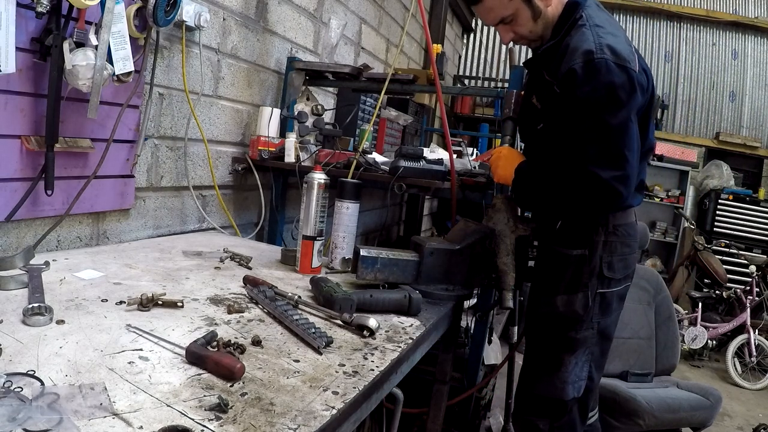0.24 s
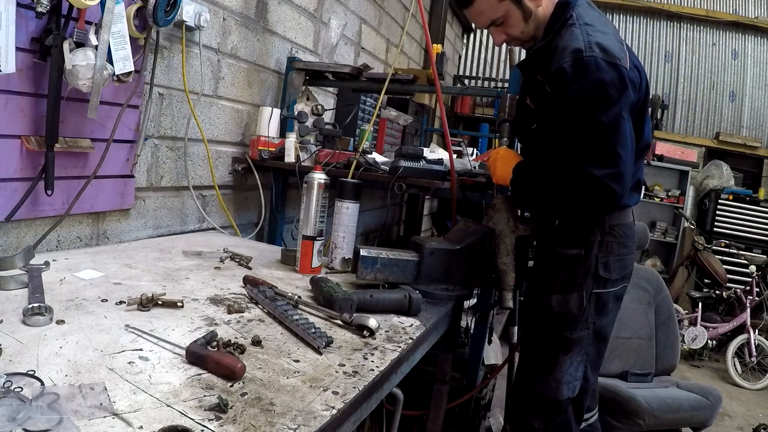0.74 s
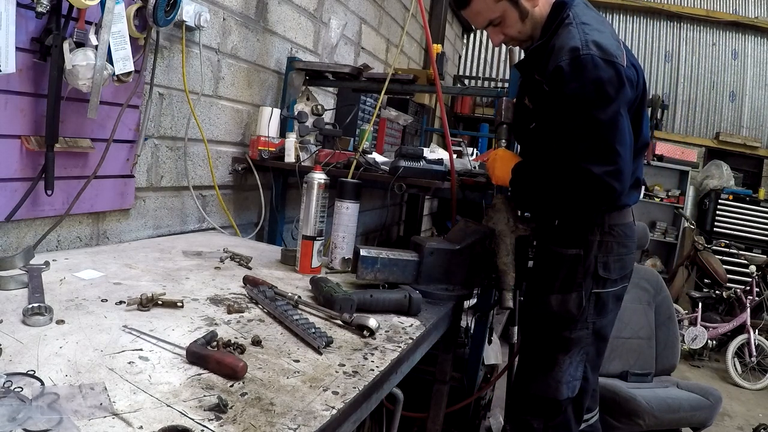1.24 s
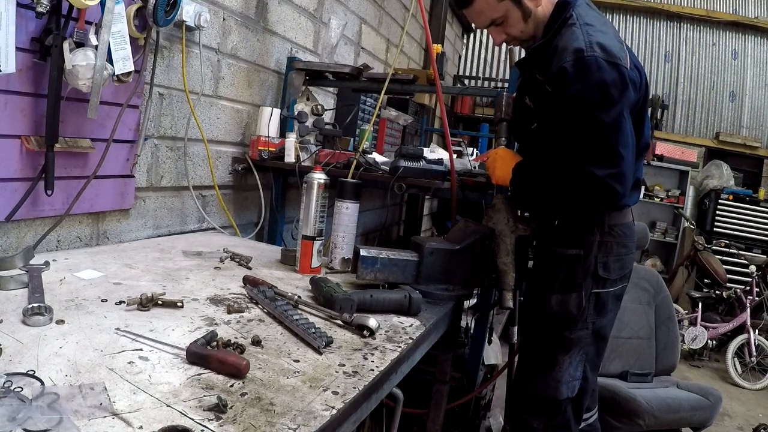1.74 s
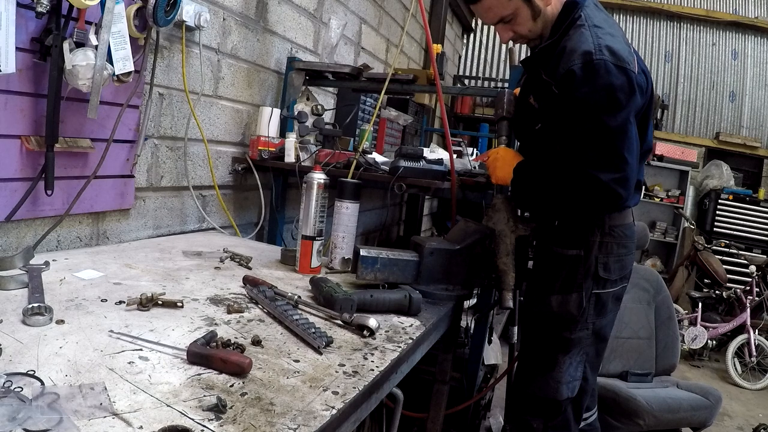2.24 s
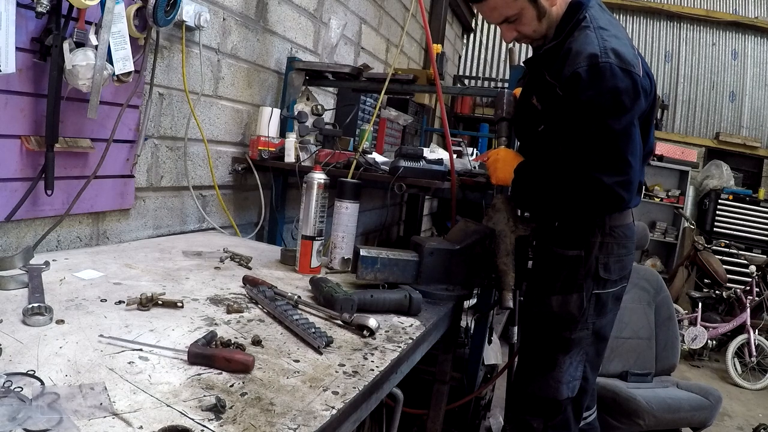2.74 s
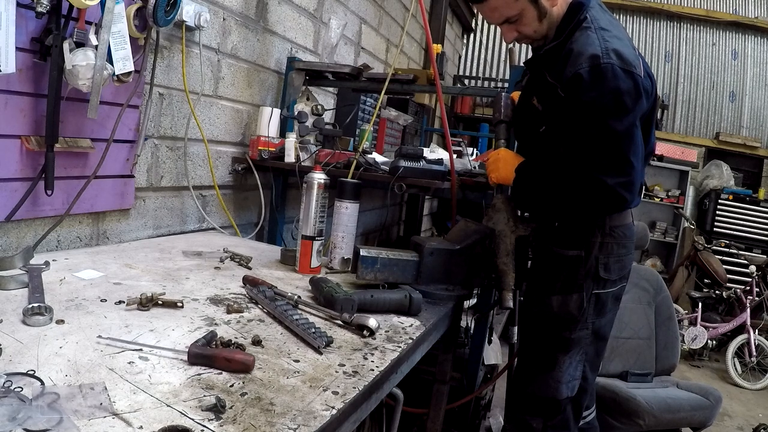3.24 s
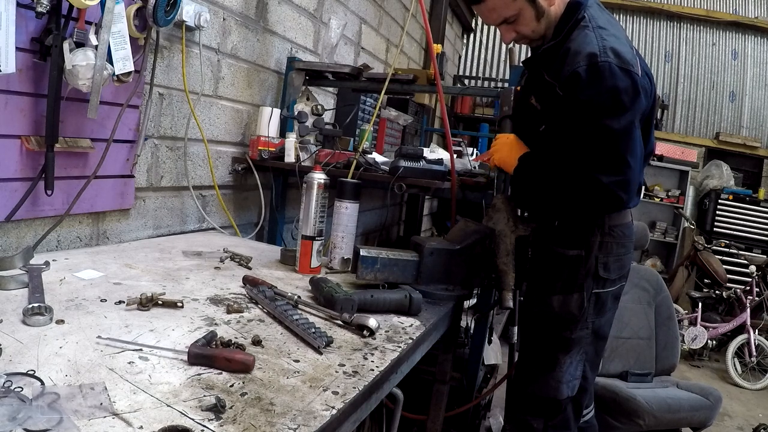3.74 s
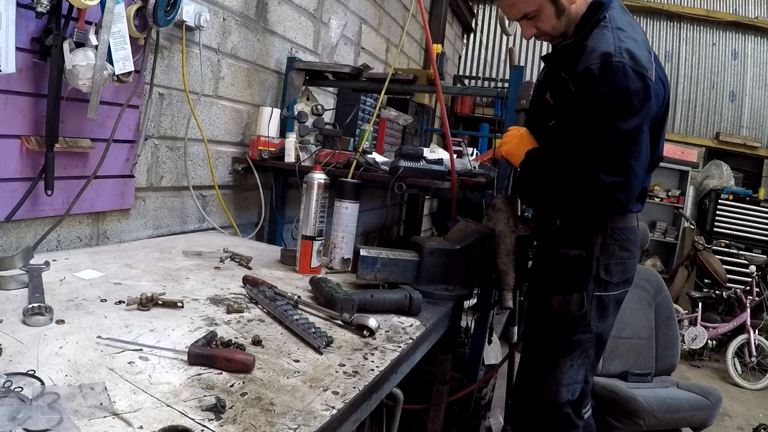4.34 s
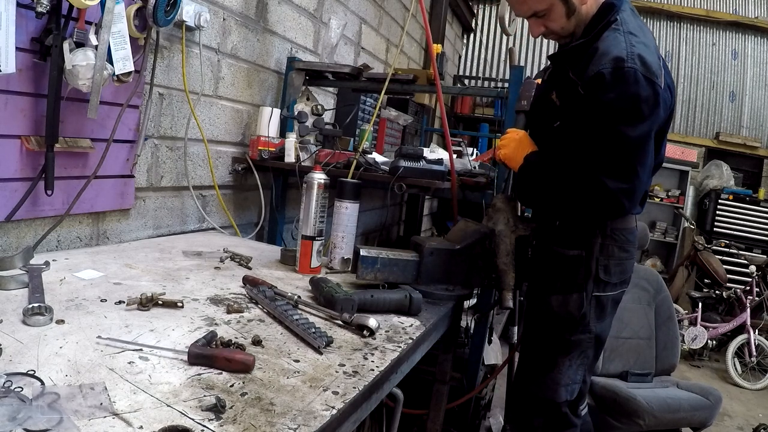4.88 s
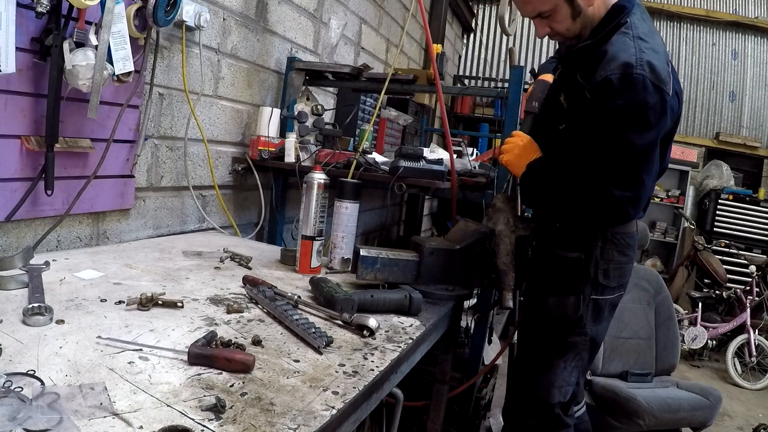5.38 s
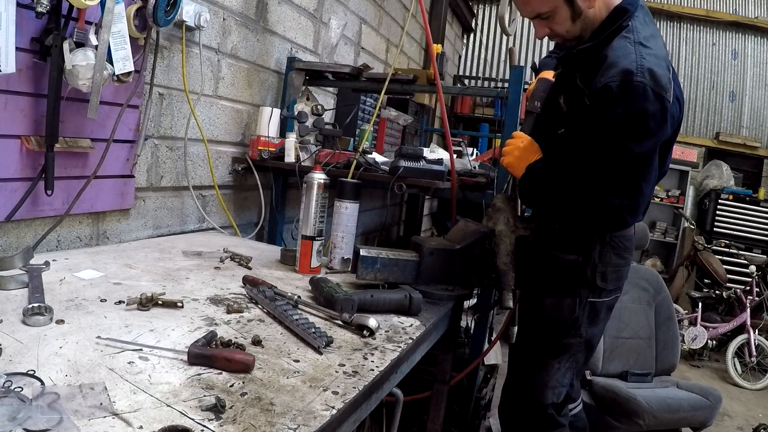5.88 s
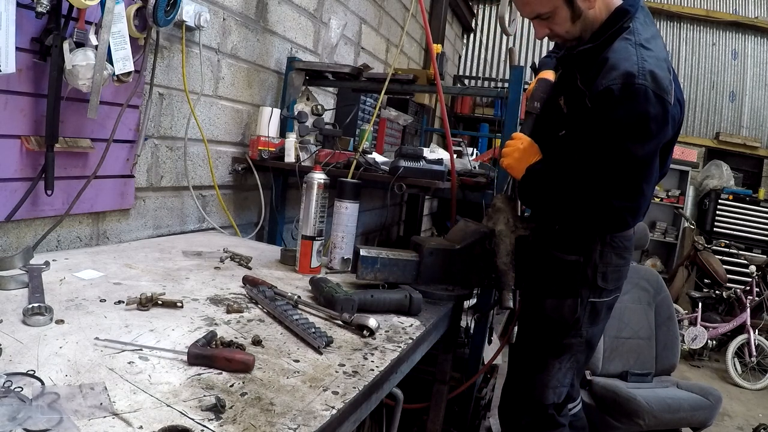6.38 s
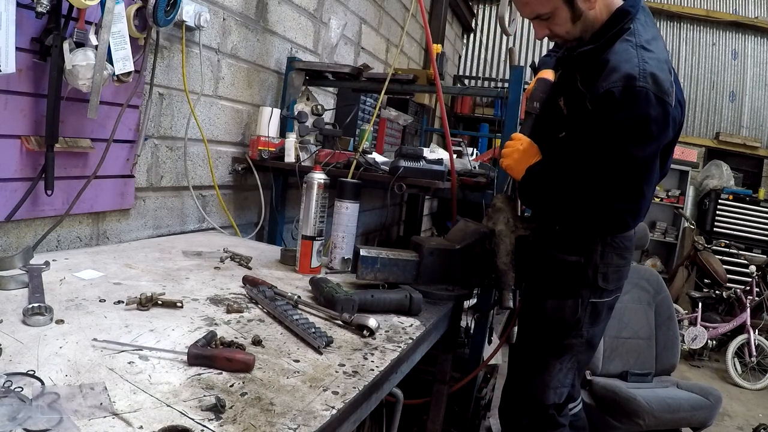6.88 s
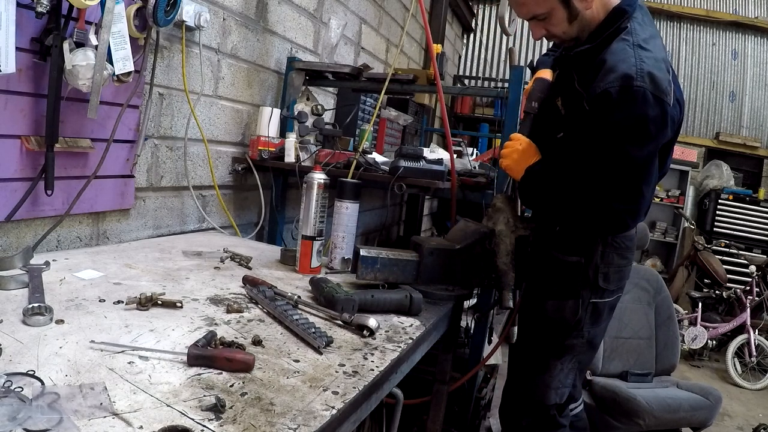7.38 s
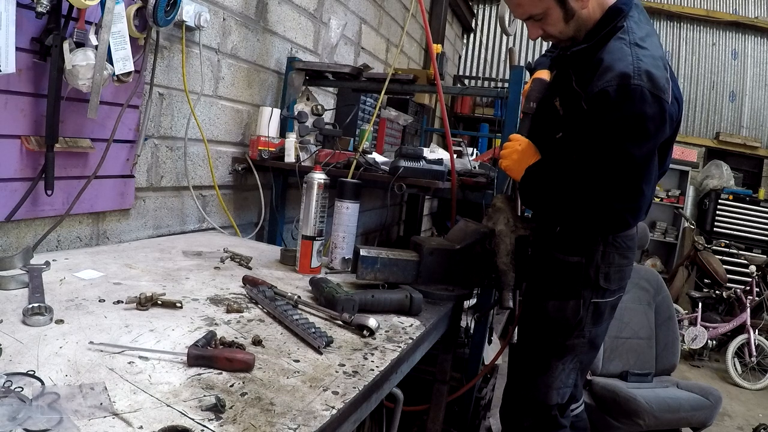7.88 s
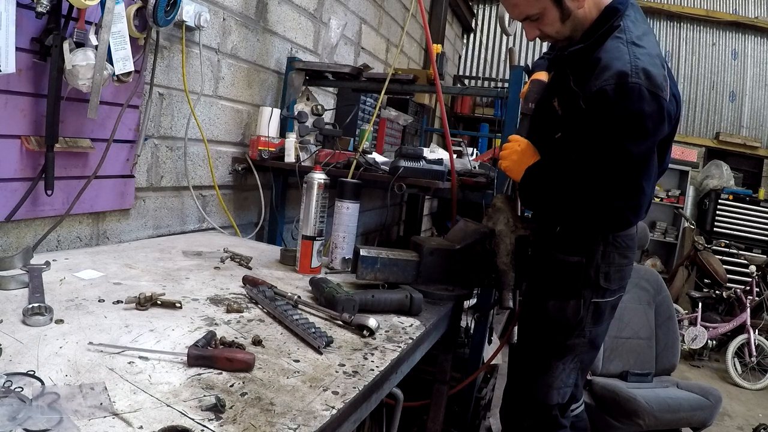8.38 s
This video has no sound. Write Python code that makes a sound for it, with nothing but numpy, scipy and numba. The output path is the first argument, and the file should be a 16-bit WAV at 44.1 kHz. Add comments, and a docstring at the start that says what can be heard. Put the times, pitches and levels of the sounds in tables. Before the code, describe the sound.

A pneumatic hammer fires a string of brief, loud bursts on metal clamped in a vise, close to the microphone. Each burst is a fast clanking rattle with a steel ring and a sizzle of exhaust air. In the gap that follows, the steady chug and hum of a compressor rises from the far side of the garage, before the tool hammers without a break to the end.

```python
"""Air hammer in a garage

Close to the microphone an air hammer works a steel part in a bench vise: seven short bursts, then one
long run with the tool upright. Each blow thumps the bench, clanks the vise, rings the steel and vents
a puff of air. A piston compressor chugs across the room; the automatic gain control pushes it down
while the hammer runs and lets it swell in the pause."""
import sys
import numpy as np
from scipy import signal
from scipy.fft import rfft, irfft
from scipy.io import wavfile
from scipy.ndimage import uniform_filter1d
from numba import njit

SR = 44100
rng = np.random.default_rng(int(sys.argv[2]) if len(sys.argv) > 2 else 0)


def write(x):
    x = np.atleast_2d(x).T
    wavfile.write(sys.argv[1], SR, np.round(np.clip(x, -1, 1) * 32767).astype(np.int16))


N = 380141
BLOW_S = .035  # nominal length of one blow
UPRIGHT_FROM_S = 5  # the tool is held flat until then

# short bursts: first_s, last_s, blows, midway_lag_s, swell_db, clank_db, thump_db, ring_db, sizzle_db
BURSTS = [(0.026, 0.198, 5, .002, 0.5, -20.5, -10.5, -16.5, -16),
          (0.609, 0.846, 7, -0.0045, 1.5, -19, -18, -21.5, -24.5),
          (1.113, 1.347, 7, -0.00023, 3, -17.5, -16, -24, -31),
          (1.699, 1.847, 5, -0.002, 3, -17, -14, -25, -29),
          (2.101, 2.640, 15, .011, 6.5, -15, -14, -19.5, -25.5),
          (2.867, 3.022, 5, -.003, -2.5, -15, -11, -20.5, -25),
          (3.228, 3.308, 3, 0.0013, -3, -18.5, -12.5, -21.5, -27.5)]
# piston speed in the long run: time_s, rate_hz
RUN_RATE = [(5.722, 23.94), (5.85, 27.98), (6.0, 27.47), (6.3, 28.4), (6.75, 28.87), (7.1, 28.23),
            (7.5, 28.36), (7.9, 27.9), (8.3, 27.56), (8.62, 26.88)]


def undb(db):
    """Decibels to gain."""
    return 10 ** (np.asarray(db) / 20)


def level(x, db):
    """Set the rms level."""
    return x * undb(db) / np.sqrt(np.mean(x ** 2))


def unit(h):
    """Scale a response to unit energy."""
    return h / np.sqrt(np.sum(h ** 2))


def seconds(length):
    """Time axis of a given length."""
    return np.arange(int(length * SR)) / SR


def through(x, h):
    """Pass a sound through a response."""
    return signal.oaconvolve(x, h)[:N]


def causal(gain):
    """Minimum-phase response with the given spectral shape, from the cepstrum."""
    cepstrum = irfft(np.log(gain))
    cepstrum[1:len(gain) - 1] *= 2
    cepstrum[len(gain):] = 0
    return unit(irfft(np.exp(rfft(cepstrum))))


def colour(points, size=4096):
    """Response shaped by points of frequency_hz, level_db."""
    hz, db = np.transpose(points)
    bins_hz = np.maximum(np.fft.rfftfreq(size, 1 / SR), 1)
    return causal(undb(np.interp(np.log(bins_hz), np.log(hz), db)))


def pulses(times, db):
    """Impulses whose energy, spread over one blow, has the given level."""
    x = np.zeros(N)
    starts = np.clip(np.round(times * SR).astype(int), 0, N - 1)
    np.add.at(x, starts, undb(db) * np.sqrt(BLOW_S * SR))
    return x


def puffs(hits, rise_s, fall_s):
    """A fresh burst of turbulence after each impulse."""
    t = seconds(.2)
    shape = unit((1 - np.exp(-t / rise_s)) * np.exp(-t / fall_s))
    return np.sqrt(np.abs(through(hits ** 2, shape ** 2))) * rng.standard_normal(N)


def ring(times, db, modes, scatter_db, detune, seats=4):
    """Each blow excites its own mix of modes; the chisel seats in a few ways, each detuning them."""
    hz, t60, flat_db, upright_db = np.transpose(modes)[:, :, None]
    t = seconds(.6)
    sines = np.array([np.sin(2 * np.pi * hz * (1 + detune * pull) * t)
                      for pull in np.linspace(-1, 1, seats)])
    shapes = sines * undb(-60 * t / t60)
    shapes /= np.sqrt(np.sum(shapes ** 2, axis=2, keepdims=True))
    uneven_db = scatter_db * rng.standard_normal((len(hz), len(times)))
    seating = rng.integers(0, seats, (len(times), len(hz)))
    gains = undb(db + np.where(times < UPRIGHT_FROM_S, flat_db, upright_db) + uneven_db).T
    x = np.zeros(N + len(t))
    for start, gain, seat in zip(np.clip(times * SR, 0, N).astype(int), gains, seating):
        x[start:start + len(t)] += gain @ shapes[seat, np.arange(len(hz))]
    return x[:N] * np.sqrt(BLOW_S * SR)


def reflections(envelope):
    """Dense echoes under an envelope."""
    return unit(envelope * rng.standard_normal(len(envelope)))


def garage(x, direct_db, tail_db, t60, rise_s, near_s, dull_hz=8500, even_hz=60, size=65536):
    """The microphone hears the direct sound, echoes off bench, wall and shelves, then a duller tail."""
    t = seconds(.8)
    near = reflections((1 - np.exp(-t / rise_s)) * np.exp(-t / near_s))
    tail = reflections((1 - np.exp(-t / .015)) * undb(-60 * t / t60))
    room = near + undb(tail_db) * signal.sosfilt(signal.butter(2, dull_hz, fs=SR, output="sos"), tail)
    room[0] += undb(direct_db)
    # even out the random echoes so no band wider than even_hz stands out
    spectrum = rfft(room, size)
    power = uniform_filter1d(np.abs(spectrum) ** 2, int(even_hz * size / SR) + 1)
    evened = irfft(spectrum * rfft(causal(power ** -.5)))
    return through(x, unit(evened[:len(t)]))


def compressor(stroke_hz=18.09, pump_db=-24, air_db=-26, tones_db=-2, throb=.022):
    """Even piston strokes knock from the far side of the room; intake air rushes and a leak hisses."""
    # spectra of the knock and of the air: frequency_hz, level_db
    knock_colour = [(25, 0), (50, -2), (80, -10), (115, 5.5), (160, 5.5), (250, -7.5), (300, -1.5),
                    (400, -9.5), (550, -1), (615, -8.5), (680, -1), (930, -9.5), (1080, -17.5),
                    (1340, -8.5), (2500, -25.5), (6000, -70)]
    air_colour = [(25, -7), (60, 7.5), (120, 2), (200, 2.5), (400, -15.5), (750, -1.5), (1100, -12),
                  (2500, -11.5), (3200, -16), (5500, -18.5), (7800, -36.5), (8500, -32), (8900, -18.5),
                  (9500, -29.5), (10500, -38), (15000, -46.5)]
    # harmonics of the stroke rate: multiple, level_db
    pump_tones = [(3, -26.5), (6, -25), (7, -41), (10, -33), (11, -33.5), (14, -35.5), (18, -30.5),
                  (20, -34), (36, -39), (38, -32), (41, -33), (44, -38.5), (50, -34.5), (51, -40)]
    # motor hum: pitch_hz, level_db
    motor_tones = [(100, -35), (116, -32)]
    t = np.arange(N) / SR
    times = np.arange(0, N / SR, 1 / stroke_hz)
    jitter, uneven_db = rng.standard_normal((2, len(times)))
    strokes = through(pulses(times + .0001 * jitter, uneven_db), colour(knock_colour))
    knock = garage(strokes, direct_db=-9.5, tail_db=2, t60=.51, rise_s=.0052, near_s=.04, even_hz=25.6)
    turn = 2 * np.pi * stroke_hz * t
    tones = sum(undb(db) * np.sqrt(2) * np.sin(k * turn + rng.uniform(0, 2 * np.pi))
                for k, db in pump_tones)
    motor = sum(undb(db) * np.sqrt(2) * np.sin(2 * np.pi * hz * t) for hz, db in motor_tones)
    air = through(rng.standard_normal(N) * (1 + throb * np.sin(turn)), colour(air_colour))
    return level(knock, pump_db) + undb(tones_db) * tones + motor + level(air, air_db)


def trigger(lead_s=.0275, level_db=-20.5):
    """The trigger valve spits air just before the piston starts."""
    times = np.array([row[0] for row in BURSTS + RUN_RATE[:1]]) - lead_s
    air = puffs(pulses(times[times > 0], level_db), rise_s=.0037, fall_s=.0042)
    spit = through(air, colour([(1500, -19), (4500, 0), (6500, -2), (9000, -21), (15000, -23)]))
    return garage(spit, direct_db=19.5, tail_db=27, t60=.65, rise_s=.003, near_s=.0084)


def stray_blows():
    """An opening knock with the hammer already running, then lone blows after the bursts."""
    # levels relative to the burst: start_s, strike_db, thump_db
    strays = [(0.0, -10.5, -5), (0.275, 0, -22), (0.903, -1, -12), (0.999, -13, -29), (1.398, 0, -27),
              (1.491, -8.5, -24), (1.904, -0.5, -12), (2.004, -13, -28), (2.706, -1.5, -8),
              (3.108, -8.5, -25), (3.358, -9, -5.5), (3.394, -16, -19)]
    rows = []
    for start_s, strike_db, thump_db in strays:
        burst = max((b for b in BURSTS if b[0] < start_s), default=BURSTS[0])
        rows.append((start_s, *np.add(burst[-4:], [strike_db, thump_db, strike_db, strike_db])))
    return np.array(rows)


def burst_blows(scatter_db=1.43, thump_start_db=-4.5, build_s=.041):
    """Near-even piston strokes that drag or hurry midway while the recoil builds."""
    rows = []
    for first_s, last_s, count, lag_s, swell_db, *parts_db in BURSTS:
        progress = np.linspace(0, 1, count)
        times = first_s + (last_s - first_s) * progress + lag_s * np.sin(np.pi * progress) ** 4
        uneven_db = scatter_db * rng.standard_normal((count, 4)).T
        levels_db = np.array(parts_db)[:, None] + swell_db * (progress - .5) + uneven_db
        clank, thump, ringing, sizzle = levels_db
        thump += thump_start_db * np.exp((first_s - times) / build_s)
        rows.append(np.c_[times, clank, thump, ringing, sizzle])
    return np.vstack(rows)


def run_blows(bite_s=.06, jitter_s=.00004, scatter_db=.26):
    """The free-running piston strikes once a cycle; the treble comes up as the chisel bites."""
    # balance through the long run: time_s, clank_db, thump_db, ring_db, sizzle_db
    run_levels = [(5.85, -17.5, -14.5, -16, -20), (6.1, -18.5, -14.5, -16.5, -16),
                  (6.45, -23, -17, -18, -17.5), (6.9, -25.5, -21, -21.5, -20),
                  (7.25, -21.5, -22, -22.5, -27), (7.6, -19.5, -19.5, -21, -30),
                  (8.0, -16, -16.2, -18.5, -32.5), (8.25, -14.5, -14.5, -18, -28),
                  (8.55, -12, -11, -19, -24.5)]
    rate_s, rate_hz = np.transpose(RUN_RATE)
    t = np.arange(rate_s[0], N / SR, 1 / SR)
    cycles = np.cumsum(np.interp(t, rate_s, rate_hz)) / SR
    times = np.interp(np.arange(int(cycles[-1]) + 1), cycles, t)
    level_s, *columns = np.transpose(run_levels)
    parts_db = np.transpose([np.interp(times, level_s, column) for column in columns])
    slack = np.exp((times[0] - times) / bite_s)
    parts_db += np.outer(slack, [-4.5, 0, -11.5, -11.5])  # all but the thump start weak
    times += jitter_s * rng.standard_normal(len(times))
    return np.c_[times, parts_db + scatter_db * rng.standard_normal(parts_db.shape)]


def whistle(times, ring_db, sizzle_db, lag_s=.0022, glide_s=.0049, length_s=.017, scatter=.0114):
    """The piston uncovers the exhaust port and the jet chirps upward."""
    # port chirp, tool flat and then upright: start_hz, end_hz, level_db
    chirps = [(4990, 5900, -6), (4040, 4800, -6)]
    t = seconds(length_s)
    shape = unit(np.sin(np.pi * t / length_s)) * np.sqrt(2 * BLOW_S * SR)
    blow_db = np.where(times < UPRIGHT_FROM_S, sizzle_db, ring_db) - 3.5
    jet = np.zeros(N + SR)
    for start_s, db in zip(times, blow_db):
        start_hz, end_hz, port_db = chirps[int(start_s >= UPRIGHT_FROM_S)]
        pull, phase = rng.standard_normal(2)
        hz = (end_hz + (start_hz - end_hz) * np.exp(-t / glide_s)) * (1 + scatter * pull)
        chirp = shape * np.sin(2 * np.pi * (np.cumsum(hz) / SR + phase))
        start = int((start_s + lag_s) * SR)
        jet[start:start + len(t)] += undb(db + port_db) * chirp
    return garage(jet[:N], direct_db=6.5, tail_db=-4, t60=.32, rise_s=.0038, near_s=.021)


def bench(times, db, lag_s=.00076, dead_db=-3):
    """The piston's recoil thumps tool and bench."""
    # modes of bench and tool body: pitch_hz, t60_s, flat_db, upright_db
    modes = [(100.7, 0.8, -13, -30), (131.4, 0.37, -1.5, -44), (140.6, 0.29, -4.5, -3.5),
             (192.2, 0.18, -7, -8.5), (216, 0.43, -12, -17), (249.4, 0.15, -8.5, -4),
             (284.6, 0.06, -7.5, -4.5), (361, 0.046, -26, -8)]
    # dead part of the thump: frequency_hz, level_db
    thump_colour = [(25, -52), (55, -21), (90, -2), (140, -2), (280, 8), (420, -11.5), (600, -3.5),
                    (1000, -15.5), (3000, -34.5)]
    body = ring(times + lag_s, db, modes, scatter_db=.64, detune=.012)
    thump = body + through(pulses(times + lag_s, db + dead_db), colour(thump_colour))
    return garage(thump, direct_db=-2.5, tail_db=-9, t60=.54, rise_s=.0062, near_s=.0093, even_hz=8.7)


def vise(times, db, lag_s=.0035, touch_db=-10.5, dead_db=-3, rattle_db=-12.5, body_db=-3):
    """The chisel touches, then drives the part into the jaws, where it clanks and rattles."""
    # modes of the vise: pitch_hz, t60_s, flat_db, upright_db
    modes = [(498.5, 0.15, -46, -4.5), (538.6, 0.086, -3.5, 0.5), (583.7, 0.063, -3.5, -8),
             (878.5, 0.11, -9, -10), (920, 0.076, -11.5, -12.5), (1016.3, 0.052, -3.5, -5.5),
             (1109, 0.1, -13, -10), (1294, 0.032, -7.5, -8.5), (1520, 0.074, -11.5, -47)]
    # dead part of the clank: frequency_hz, level_db
    clank_colour = [(250, -33.5), (500, 1.5), (700, 2), (950, 10), (1200, -0.5), (1450, 1), (1800, -14.5),
                    (3000, -23.5), (8000, -10.5), (10000, -20), (11400, -27.5), (12700, -14), (15500, -32)]
    touch = puffs(pulses(times, db + touch_db), rise_s=.0014, fall_s=.0024)
    hits = pulses(times + lag_s, db)
    rattle = undb(rattle_db) * puffs(hits, rise_s=.00048, fall_s=.0072)
    body = ring(times + lag_s, db + body_db, modes, scatter_db=.5, detune=.0025)
    clank = body + through(touch + undb(dead_db) * hits + rattle, colour(clank_colour))
    return garage(clank, direct_db=-3.5, tail_db=-5, t60=.44, rise_s=.00059, near_s=.011, even_hz=28)


def steel(times, ring_db, sizzle_db, lag_s=.001477, sizzle_from_hz=5400,
          modes_db=-4, crack_db=-5, rasp_db=-6, pop_db=-9, air_db=-5):
    """Each blow cracks, rasps and rings the steel; exhaust air sizzles over the highest modes."""
    # modes of part and chisel: pitch_hz, t60_s, flat_db, upright_db
    modes = [(1997, 0.038, -23, -18), (2163, 0.19, -12.5, -18), (2351, 0.11, -9.5, -9.5),
             (3174, 0.029, -11.5, -4), (3696, 0.045, -2, .5), (3750, 0.12, -25, -13),
             (4470, 0.082, -13, -11), (4674, 0.21, -12, -6.5), (4760, 0.37, -25, -23),
             (5132, 0.33, -8, -12.5), (5520, 0.077, -10, -4), (5750, 0.12, -6, -13.5),
             (5890, 0.1, -12, -12), (5932, 0.095, -32.5, -5), (6600, 0.13, -12, -29),
             (6580, 0.27, -9.5, -13), (6830, .3, -16, -31), (7700, 0.062, -28, -32),
             (7500, 0.089, -22, -24), (8060, 0.45, -15, -37), (8410, 0.43, -15, -21)]
    # spectra of the contact and of the exhaust: frequency_hz, level_db
    contact_colour = [(1200, -30.5), (2100, 6), (2400, 8), (2700, -5), (3200, 6.5), (4000, 7.5),
                      (5000, 5.5), (6000, -13), (9000, -35)]
    exhaust_colour = [(3000, -19), (5000, -3.5), (6000, 11), (6900, 0), (7800, 4.5), (8800, -24),
                      (10800, -6.5), (11500, -30), (15500, -41)]
    high = np.array(modes)[:, :1] >= sizzle_from_hz
    drive_db = np.where(high, sizzle_db, ring_db) + modes_db
    tones = ring(times, drive_db, modes, scatter_db=1.5, detune=.0018)
    cracks = pulses(times + lag_s, ring_db + crack_db)
    rasp = undb(rasp_db) * puffs(cracks, rise_s=.0016, fall_s=.0034)
    contact = through(cracks + rasp, colour(contact_colour))
    pops = pulses(times, sizzle_db)
    air = undb(air_db) * puffs(pops, rise_s=.0018, fall_s=.0037)
    exhaust = through(undb(pop_db) * pops + air, colour(exhaust_colour))
    ringing = garage(tones, direct_db=-1.5, tail_db=-8.5, t60=.67, rise_s=.0023, near_s=.013, even_hz=68)
    return ringing + garage(contact + exhaust, direct_db=-11, tail_db=-2, t60=.58,
                            rise_s=.0014, near_s=.0081, even_hz=407)


def scene(hammer_db=12):
    """One microphone near the bench, the compressor behind."""
    blows = np.vstack([burst_blows(), stray_blows(), run_blows()])
    times, clank_db, thump_db, ring_db, sizzle_db = blows.T
    hammer = bench(times, thump_db - 2) + vise(times, clank_db - 2)
    hammer += steel(times, ring_db, sizzle_db) + whistle(times, ring_db, sizzle_db)
    return (undb(hammer_db) * hammer + trigger() + compressor())[None]


@njit
def follow(x, held, attack, release):
    """Envelope that rises fast and sinks slowly."""
    envelope = np.empty(len(x))
    for i in range(len(x)):
        held += (x[i] - held) * (attack if x[i] > held else release)
        envelope[i] = held
    return envelope


def record(dry, knee_db=-10, ratio=5.28, attack_s=.013, release_s=.43, start_db=3,
           low_hz=28, top_hz=15300):
    """Gain control ducks under the hammer, peaks that slip past clip, and deep bass and top are cut."""
    envelope = follow(np.abs(dry[0]), float(undb(start_db)), 1 / (attack_s * SR), 1 / (release_s * SR))
    ducked = dry * np.minimum(undb(knee_db) / envelope, 1) ** (1 - 1 / ratio)
    low_cut = signal.sosfilt(signal.butter(2, low_hz, "high", fs=SR, output="sos"), ducked)
    clipped = low_cut / (1 + low_cut ** 10) ** (1 / 10)
    return signal.sosfilt(signal.ellip(10, .2, 70, top_hz, fs=SR, output="sos"), clipped)


dry = scene()
out = record(dry)
write(out)
```